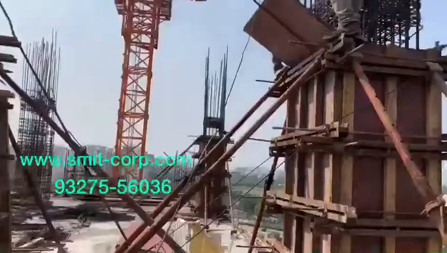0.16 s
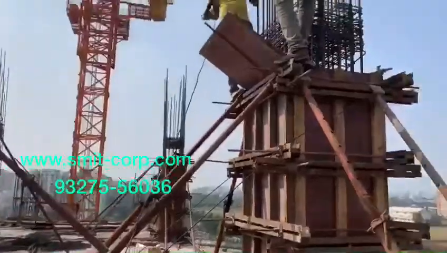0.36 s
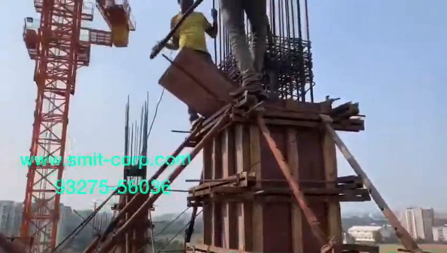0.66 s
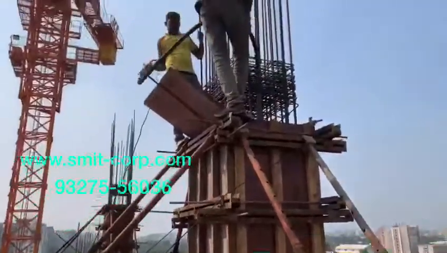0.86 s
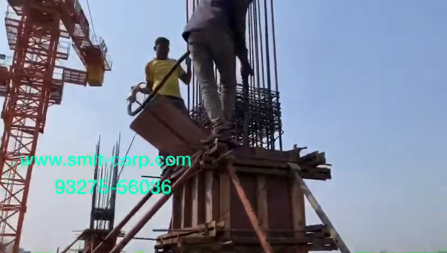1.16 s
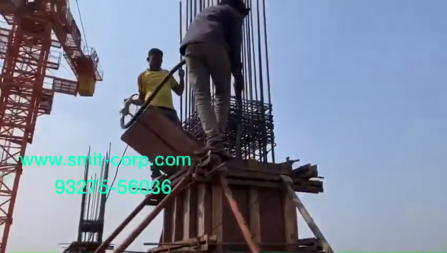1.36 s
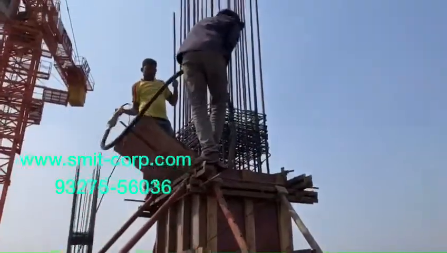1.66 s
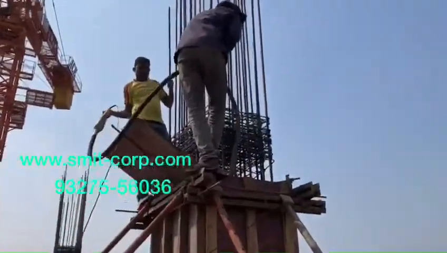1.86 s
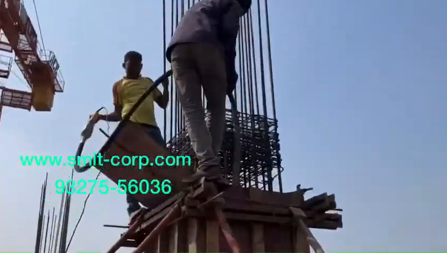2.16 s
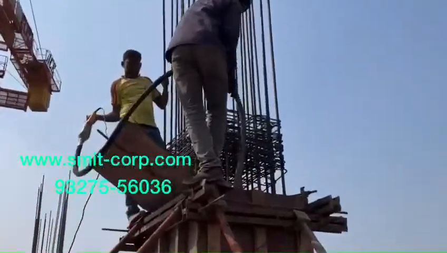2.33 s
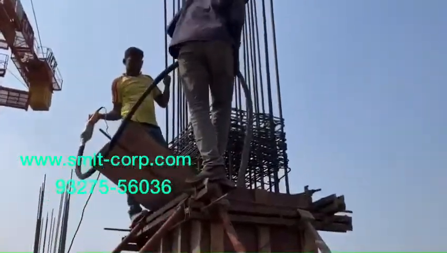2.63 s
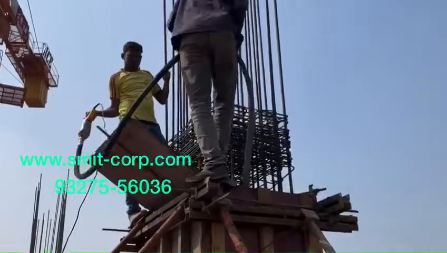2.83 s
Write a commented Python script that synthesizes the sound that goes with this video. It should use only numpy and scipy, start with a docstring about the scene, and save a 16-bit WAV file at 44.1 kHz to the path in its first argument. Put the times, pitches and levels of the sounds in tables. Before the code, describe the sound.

A concrete vibrator buzzes and whines on a building site, easing briefly, then rattling harder.

```python
"""Concrete vibrator in a column form

Open building site, two microphone ports a few metres from a high-speed poker. Its rotor orbits about
five times per shaft turn: a buzz of split harmonics, rattle and slap of steel and shuttering, bursts of
squeal and a thin whine. It eases briefly, then bites harder. An engine drones behind, and the timber
takes two knocks."""
import sys
import numpy as np
from scipy import signal
from scipy.fft import rfft, irfft
from scipy.io import wavfile

SR = 44100
rng = np.random.default_rng(int(sys.argv[2]) if len(sys.argv) > 2 else 0)


def unload_audio(sound):
    """Save the sound as a 16-bit wav file, at the path given as the first command line argument."""
    columns = np.transpose(np.atleast_2d(sound))
    # keep every value between -1 and 1, then stretch to whole-number steps
    steps = np.round(np.clip(columns, -1, 1) * 32767)
    wavfile.write(sys.argv[1], SR, steps.astype(np.int16))


N = 131859

# Low-mid rush of the site: spectrum (f/Hz, level/dB) and loudness (t/s, level/dB)
RUSH_SPECTRUM = [(110, -3.5), (160, 0), (250, 4.5), (310, -5.5), (400, -4), (490, -9), (560, -9),
                 (700, -7.5), (1000, -96)]
RUSH_LEVEL = [(0, -46), (1.3, -43), (2.04, -44.5), (2.15, -62), (2.39, -63), (2.44, -56), (2.63, -50.5),
              (2.99, -49.5)]
# Engine in the background: harmonics (multiple, level/dB) and rumble (f/Hz, level/dB)
ENGINE_HARMONICS = [(2, -42.5), (3, -50.5), (4, -57)]
RUMBLE_SPECTRUM = [(20, -32), (45, -3), (70, 14), (100, 16.5), (130, 6.5), (180, -37), (300, -67)]

# Knocks on the shuttering (t/s, level/dB, gain of the crack, pitch factor of the timber)
KNOCKS = [(1.449, -21, 0.33, .78), (2.717, -5.5, 0.61, 0.99)]
# Modes of the timber, the contact and the hollow form (f/Hz, t60/s, level/dB, delay/s)
TIMBER_MODES = [(205, .07, -3, .002), (232, .25, -18, .01), (485, .08, 1, .003), (680, .08, -4, .001)]
CRACK_MODES = [(900, .04, 5, -.005), (1310, .055, 7.5, -.002)]
BOOM_MODES = [(255, .13, -4, -.004)]
# Splintery crunch around a knock (f/Hz, level/dB)
CRUNCH_SPECTRUM = [(200, -11), (700, 5), (1500, 2.5), (2800, 3), (4500, -5), (7000, -62)]

# Whine of the drive: pitch, which sets the rotor's speed (t/s, f/Hz), and loudness (t/s, level/dB)
WHINE_PITCH = [(0, 11360), (.3, 11455), (.67, 11550), (.84, 11525), (1.04, 11600), (1.36, 11520),
               (1.7, 11565), (2.0, 11598), (2.3, 11600), (2.45, 11655), (2.7, 11662), (2.99, 11642)]
WHINE_LEVEL = [(0.0, -30), (0.06, -42), (0.12, -30), (0.24, -45.5), (0.33, -32.5), (0.38, -43), (0.45, -30),
               (0.59, -47), (0.77, -34), (0.82, -44), (1.04, -31.5), (1.41, -32), (1.51, -41), (1.63, -32),
               (2.29, -36.5), (2.36, -31.5), (2.86, -38), (2.99, -33.5)]
# Drive hiss, central and in opposite phase at the ports (f/Hz, level/dB); its loudness (t/s, level/dB)
HISS_SPECTRUM = [(8700, -62), (9200, -8), (9700, 3), (10500, 3.5), (11100, 6), (11500, -4), (11800, -18)]
WIDE_HISS_SPECTRUM = [(7000, -29.5), (7700, 0), (8500, 11), (9200, -5), (10000, 8), (10400, -10),
                      (11000, -41)]
HISS_LEVEL = [(0, -39), (.7, -37.5), (1.1, -36.5), (1.5, -36), (1.85, -33.5), (2.3, -32.5), (2.65, -33),
              (2.99, -36.5)]

# Poker scraping the bars: surges (t/s, length/s, level/dB) and spectrum (f/Hz, level/dB)
SCRAPES = [(.73, 0.029, -36.5), (0.977, 0.09, -43), (1.106, 0.028, -33.5), (1.32, 0.019, -34),
           (1.495, 0.033, -41), (2.13, 0.017, -49)]
SCRAPE_SPECTRUM = [(1500, -3), (3500, -1.5), (5200, -2), (6500, 3), (7200, 8), (8000, -32)]
# Steel squealing on steel: bursts (t/s, length/s, level/dB) and resonance (f/Hz, level/dB)
SQUEALS = [(1.251, 0.029, -31), (1.674, 0.036, -21.5), (1.798, 0.026, -22.5), (1.94, 0.05, -31),
           (2.027, 0.029, -22.5), (2.133, 0.023, -28), (2.186, 0.013, -32), (2.216, 0.018, -34.5),
           (2.5, 0.13, -24.5), (2.545, 0.021, -16.5), (2.645, 0.027, -20), (2.858, 0.012, -38),
           (2.961, 0.053, -22.5)]
SQUEAL_RESONANCE = [(6300, -53), (6600, -29), (6740, 25), (6840, 21), (6940, -14), (7100, -38), (7500, -94)]
# How hard the poker bears on the form (t/s, rattle level/dB, buzz and slap level/dB)
CONTACT = [(0, -39.5, -48), (.3, -40.5, -44), (.9, -38.5, -42), (1.1, -37.5, -45.5), (1.25, -37, -43.5),
           (1.57, -36.5, -42), (1.65, -31.5, -35.5), (1.85, -27.5, -35.5), (2.07, -34, -34.5),
           (2.09, -41, -46), (2.385, -41, -48.5), (2.41, -31.5, -34), (2.58, -29, -33),
           (2.75, -25.5, -33.5), (2.99, -27.5, -32.5)]
# Partials of the slapping form (orbit multiple, shaft sideband, rise/s, level/dB, lag/turns)
SLAP_PARTIALS = [(4, 0, .0015, -8, .55), (7, 1, .0012, 0, 0), (12, 1, .001, -6, .1)]
# Spectra of the bare strikes and of the rattle, free and pressed to the form (f/Hz, level/dB)
STRIKE_SPECTRUM = [(1200, 1.6), (1900, 15), (4000, 7.5), (7000, 24.1)]
FREE_SPECTRUM = [(350, -12), (600, -13), (715, -7), (834, -2), (905, -8), (963, 0.5), (993, -4.5),
                 (1020, -11), (1080, -18), (1110, -5.5), (1230, 4), (1300, 1), (1340, -15), (1470, -1),
                 (1660, -9.5), (2000, 0), (2430, -11.5), (2780, -2.5), (2980, -4), (5090, -9), (6380, -6.5),
                 (6580, -10), (7000, -4.5), (9100, -76.5), (15400, -120)]
PRESSED_SPECTRUM = [(350, -27), (600, -3.5), (650, -13.5), (804, -18), (837, 5), (908, -17), (964, -3),
                    (1000, 0), (1060, -43), (1120, 3), (1180, 5), (1320, 2.5), (1400, -40), (1660, -29),
                    (1710, -4.5), (2230, 4), (2440, 3.5), (2540, -1), (2740, 5), (2870, -10.5), (3690, 7),
                    (4400, 3.5), (5210, -16.5), (5820, -6), (6310, -8.5), (6700, 3), (8710, -84),
                    (14700, -120)]
# Partials of the buzz (orbit multiple, shaft sideband, level/dB, change at full bite/dB)
BUZZ_PARTIALS = [(1, -1, -10, -14), (2, -2, -14, -6), (2, 1, -15, -3), (3, -1, -17, 3), (3, 1, -9, 1),
                 (4, -1, -4.5, 2), (4, 0, -13, 2), (4, 1, -7, 0), (5, -1, -11, -10), (5, 1, -22, 3),
                 (6, -1, -13, -10), (7, -2, -17, 2), (7, -1, -13, -10), (8, -1, -18, 7), (8, 1, -22, 7),
                 (9, -1, -15, 10), (10, -1, -26, 13), (12, -1, -13, 2)]

# Microphone ports: side against mid (f/Hz, level/dB) and lean to the left (f/Hz, share)
PORT_SIDE = [(110, -22), (160, -17), (210, -4), (290, -34), (350, -14), (480, -9.5), (650, -8), (960, -3.5),
             (1100, -5), (1300, -29), (1530, 6.5), (1750, 0), (2000, -13), (2220, -5), (2440, 9.5),
             (2650, -2), (3200, -3.5), (4300, -11.5), (5400, 1), (6400, -9.5), (7000, -43), (11600, -9.5)]
PORT_LEAN = [(150, 0), (320, 0.021), (650, -0.16), (1100, -0.041), (2200, -0.031), (2480, -0.55),
             (2700, 0.015), (4600, -0.11), (5400, -0.74), (6200, -0.043), (11000, -0.0054)]


def undb(db):
    """Decibels to gain."""
    return 10 ** (np.asarray(db) / 20)


def unit(x):
    """Scale to rms 1."""
    return x / np.sqrt(np.mean(x ** 2))


def clock():
    """Time of every sample in seconds."""
    return np.arange(N) / SR


def curve(table, column=1):
    """One column of a table, joined by straight lines in time."""
    rows = np.array(table, float)
    return np.interp(clock(), rows[:, 0], rows[:, column])


def across(points):
    """Spread (f/Hz, value) points over all bins along a log frequency axis."""
    rows = np.array(points, float)
    return np.interp(np.log(np.arange(N // 2 + 1) * SR / N + 1), np.log(rows[:, 0]), rows[:, 1])


def colour(x, spectrum):
    """Filter by (f/Hz, level/dB) points and scale to rms 1."""
    return unit(irfft(rfft(x) * undb(across(spectrum)), N))


def noise(spectrum):
    """Coloured noise at rms 1."""
    return colour(rng.standard_normal(N), spectrum)


def walk(rate_hz):
    """Smooth random wander at rms 1, with a bandwidth of about rate_hz."""
    hz = np.arange(N // 2 + 1) * SR / N
    lowpass = np.exp(-.5 * (hz / rate_hz) ** 2) * (hz > 0)
    return unit(irfft(rfft(rng.standard_normal(N)) * lowpass, N))


def angle(hz):
    """Running phase of a changing frequency."""
    return 2 * np.pi * np.cumsum(hz) / SR


def swell(at, length):
    """A bell-shaped envelope centred on a moment."""
    return np.exp(-2 * ((clock() - at) / length) ** 2)


def ring(modes, at, rise_s, rough_hz):
    """Damped modes that build up and waver under a scraping blow."""
    out = 0
    for hz, t60, db, delay in modes:
        age = np.maximum(clock() - at - delay, 0)
        envelope = (1 - np.exp(-age / rise_s)) * np.exp(-np.log(1000) * age / t60)
        out += undb(db) * envelope * np.sin(angle(hz + rough_hz * walk(137)))
    return out


def site_rush():
    """Low-mid air of the open site, sinking away while the poker eases."""
    return noise(RUSH_SPECTRUM) * undb(curve(RUSH_LEVEL) + .88 * walk(30))


def engine(shaft_hz=51.1, rumble_db=-44.5, dip_db=-10):
    """An unsteady drone over rumble, behind the form; it dips briefly while the poker eases."""
    shaft = angle(shaft_hz * (1 + .0094 * walk(5.5)))
    drone = 0
    for k, db in ENGINE_HARMONICS:
        drone += undb(db + 2 * walk(3.1)) * unit(np.sin(k * shaft + rng.uniform(0, 2 * np.pi)))
    rumble = noise(RUMBLE_SPECTRUM) * undb(rumble_db)
    return (drone + rumble) * undb(dip_db * swell(at=2.25, length=.15))


def knocks(crunch_db=-8.5, crunch_lag_s=.0049):
    """Blows on the shuttering: a crack and crunch of contact, then the hollow timber."""
    crunch = noise(CRUNCH_SPECTRUM) * undb(crunch_db)
    out = 0
    for at, db, crack_gain, pitch in KNOCKS:
        crack = ring(CRACK_MODES, at, rise_s=.0075, rough_hz=77.8)
        crack += crunch * swell(at + crunch_lag_s, length=.024)
        modes = [(hz * pitch, t60, mode_db, delay) for hz, t60, mode_db, delay in TIMBER_MODES]
        timber = ring(modes, at, rise_s=.009, rough_hz=18)
        out += undb(db) * (timber + crack_gain * crack)
    return out


def form_boom():
    """The hollow form answers each knock, reaching the two ports in opposite phase."""
    boom = sum(undb(db) * ring(BOOM_MODES, at, rise_s=.006, rough_hz=18) for at, db, _, _ in KNOCKS)
    return np.array([boom, -boom])


def drive_hiss(spectrum):
    """High, gently wavering hiss of the drive."""
    return noise(spectrum) * undb(curve(HISS_LEVEL) + 1.18 * walk(9))


def drive_whine(whine_hz, trim_db=1.5, flutter_db=2, octave_db=-47.5, octave_fade_s=.87):
    """The drive's thin, fluttering whine, with a lower octave that fades away."""
    phase = angle(whine_hz + 4 * walk(60))
    whine = unit(np.sin(phase)) * undb(curve(WHINE_LEVEL) + trim_db + flutter_db * walk(62))
    octave = unit(np.sin(phase / 2)) * undb(octave_db) * np.exp(-clock() / octave_fade_s)
    return whine + octave


def clamp(hz=2461.5, width_hz=56, db=-42, fade_s=.95):
    """A loose steel clamp, shaken at random, rings in one narrow resonance and fades."""
    resonance = unit(walk(width_hz) * np.sin(2 * np.pi * hz * clock()))
    return resonance * undb(db) * np.exp(-clock() / fade_s)


def bar(hz=6014, db=-37):
    """A steel bar rings along for a moment."""
    envelope = undb(db + 2 * walk(26)) * swell(at=1.88, length=.17)
    return envelope * unit(np.sin(angle(hz + 9 * walk(26))))


def scrapes(orbit):
    """The poker scrapes along the bars in short surges, chopped by the orbit."""
    envelope = sum(undb(db) * swell(at, length) for at, length, db in SCRAPES)
    chopped = rng.standard_normal(N) * (1 + np.cos(orbit) / 2)
    return envelope * colour(chopped, SCRAPE_SPECTRUM)


def squeal(whine_hz, turn, pitch_ratio=.5882, width_hz=7, bed_db=-8, throb=.15):
    """Steel on steel sings softly all along and loudly in bursts, throbbing with the shaft."""
    bed = undb(curve(CONTACT) + bed_db + 1.5 * walk(7.3))
    burst_power = sum((undb(db) * swell(at, length)) ** 2 for at, length, db in SQUEALS)
    phase = angle(whine_hz * pitch_ratio + width_hz * walk(73))
    tone = unit(np.sin(phase) * (1 + throb * np.cos(turn)))
    grit = bed * noise(SQUEAL_RESONANCE)
    return np.sqrt(bed ** 2 + burst_power) * tone + grit


def slaps(orbit, turn, rebound_db=-4, rough_rad=.45):
    """The form slaps once per shaft turn and rebounds half a turn later, ringing briefly each time."""
    turn_s = 2 * np.pi / np.gradient(turn) / SR
    out = 0
    for k, sideband, rise_s, db, lag in SLAP_PARTIALS:
        partial = 0
        for offset, hit_db in ((0, 0), (.5, rebound_db)):
            age = (turn / (2 * np.pi) - lag - offset) % 1 * turn_s
            envelope = undb(hit_db) * (age / rise_s) ** 2 * np.exp(-age / rise_s)
            partial += envelope * np.sin(k * orbit + sideband * turn + rough_rad * walk(47))
        out += undb(db) * unit(partial)
    return out * undb(curve(CONTACT, column=2))


def strikes(orbit, turn, scatter=.2, ring_s=.015):
    """One steel-on-steel strike per orbit, its direction swinging with the shaft."""
    offset_samples = (orbit % (2 * np.pi) - np.pi) / np.gradient(orbit)
    clicks = np.sinc(offset_samples / 2) * np.exp(-(offset_samples / 10) ** 2)
    force = np.cos(turn) + .66 * np.cos(2 * turn) + .23 + scatter * walk(160)
    body = rng.standard_normal(N) * np.exp(-clock() / ring_s)
    allpass = np.exp(1j * np.angle(rfft(body)))  # smears every click into the same short ring
    return colour(irfft(rfft(clicks * force) * allpass, N), STRIKE_SPECTRUM)


def rattle(orbit, turn, free_db=-35, pressed_db=.5, pressed_from_db=-36.5):
    """Strikes and a spurt of grit at every orbit; harder contact wakes the form."""
    spurts = np.exp(.11 * np.cos(orbit) + .083 * np.cos(2 * turn))
    contact_db = curve(CONTACT)
    hits = strikes(orbit, turn)

    def voice(spectrum, strike_share):
        """Strikes and grit in one colour, mixed by power."""
        grit = colour(spurts * rng.standard_normal(N), spectrum)
        return np.sqrt(strike_share) * colour(hits, spectrum) + np.sqrt(1 - strike_share) * grit

    free_gain = undb(free_db + np.minimum(contact_db - pressed_from_db, 0))
    free = voice(FREE_SPECTRUM, strike_share=.3) * free_gain
    excess_power = np.maximum(undb(contact_db) ** 2 - undb(pressed_from_db) ** 2, 0)
    pressed = voice(PRESSED_SPECTRUM, strike_share=.6) * np.sqrt(excess_power) * undb(pressed_db)
    return (free + pressed) * undb(.6 * walk(20))


def buzz(orbit, turn, bite_from_db=-36, bite_full_db=-32, wander_db=1.8, trim_db=1.5):
    """Harmonics of the orbit, split by the turning shaft; a hard bite brings out the upper ones."""
    level_db = curve(CONTACT, column=2)
    bite = np.clip((level_db - bite_from_db) / (bite_full_db - bite_from_db), 0, 1)
    out = 0
    for k, sideband, db, bite_db in BUZZ_PARTIALS:
        phase = k * orbit + sideband * turn + rng.uniform(0, 2 * np.pi) + .15 * walk(6.3)
        out += undb(db + bite_db * bite + wander_db * walk(3)) * np.sin(phase)
    return unit(out) * undb(level_db + trim_db)


def microphone(mid, echo_decay_s=.083, diffuse_db=-10):
    """Two ports hear the site with phase and level differences, scattered echoes and wide hiss."""
    side_db = across(PORT_SIDE)
    echoes = rng.standard_normal(N) * np.exp(-clock() / echo_decay_s)
    scatter = undb(diffuse_db + side_db / 2) * rfft(echoes) / np.linalg.norm(echoes)
    direct = 1j * undb(side_db) + across(PORT_LEAN)
    side = irfft(rfft(mid) * (direct + scatter), N) + drive_hiss(WIDE_HISS_SPECTRUM)
    return np.array([mid + side, mid - side])


def scene(whine_per_orbit=38.14, orbits_per_turn=5.21, speed_jitter=.0007):
    """The poker and its form a few metres from the microphone, the engine and the site behind."""
    whine_hz = curve(WHINE_PITCH)
    orbit = angle(whine_hz / whine_per_orbit * (1 + speed_jitter * walk(24)))  # rotor phase
    turn = orbit / orbits_per_turn  # shaft phase
    form = buzz(orbit, turn) + rattle(orbit, turn) + slaps(orbit, turn)
    steel = squeal(whine_hz, turn) + bar() + scrapes(orbit) + clamp()
    drive = drive_whine(whine_hz) + drive_hiss(HISS_SPECTRUM)
    background = engine() + site_rush()
    return microphone(form + steel + drive + background + knocks()) + form_boom()


def record(dry, top_hz=11950):
    """The recorder cuts the top with a steep low-pass."""
    return signal.sosfilt(signal.ellip(12, .1, 90, top_hz, fs=SR, output="sos"), dry)


dry = scene()
out = record(dry)
unload_audio(out)
```